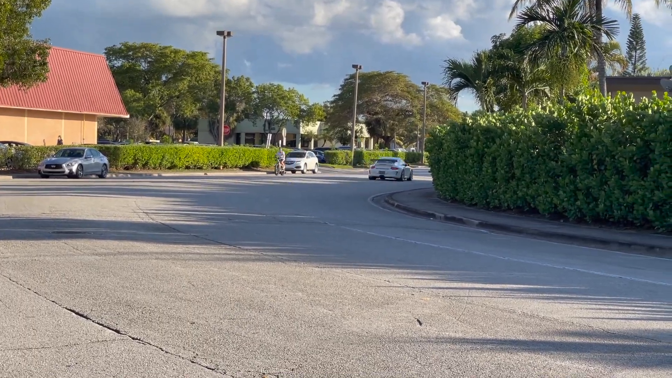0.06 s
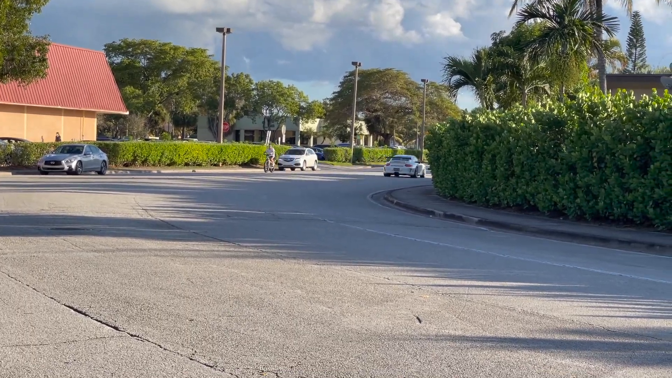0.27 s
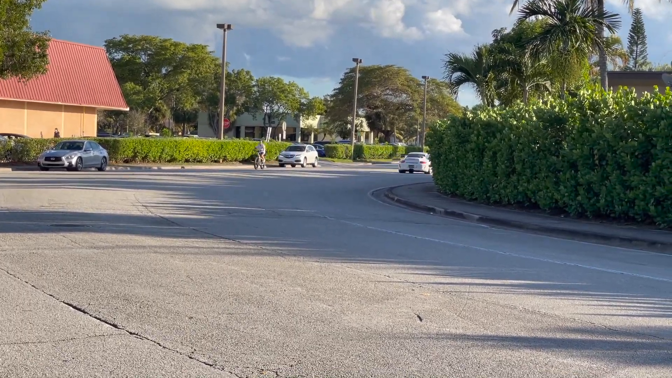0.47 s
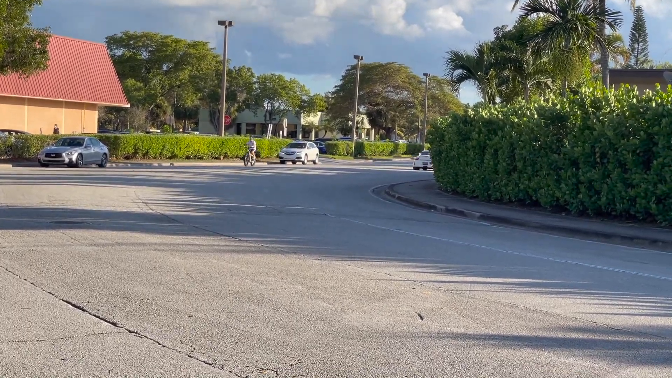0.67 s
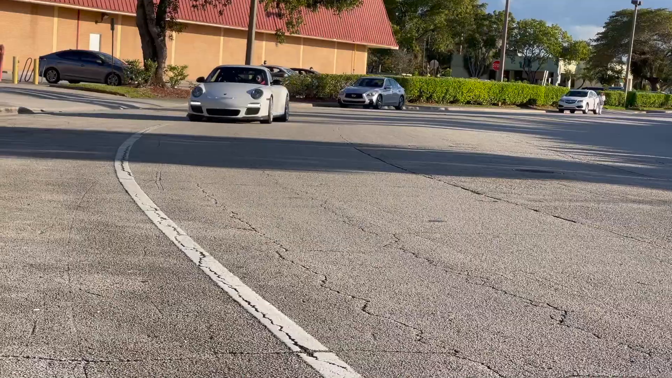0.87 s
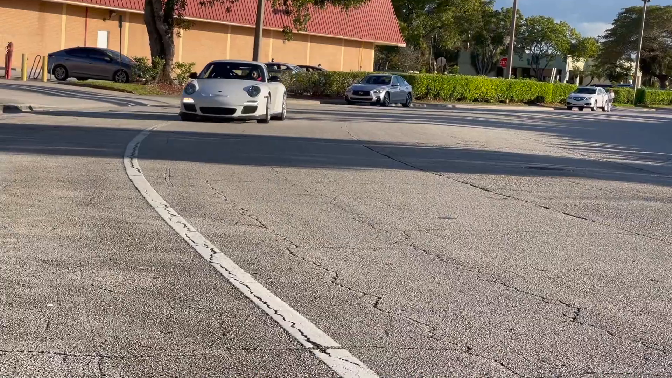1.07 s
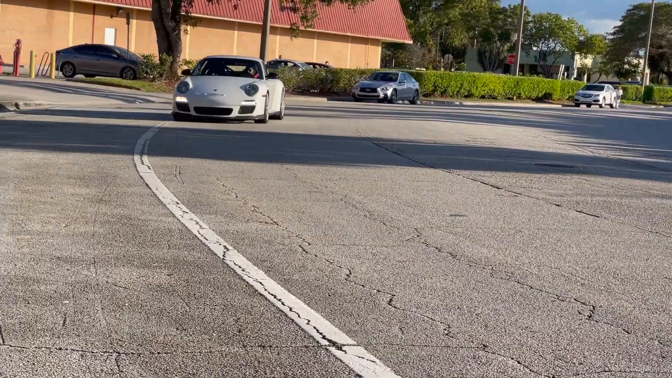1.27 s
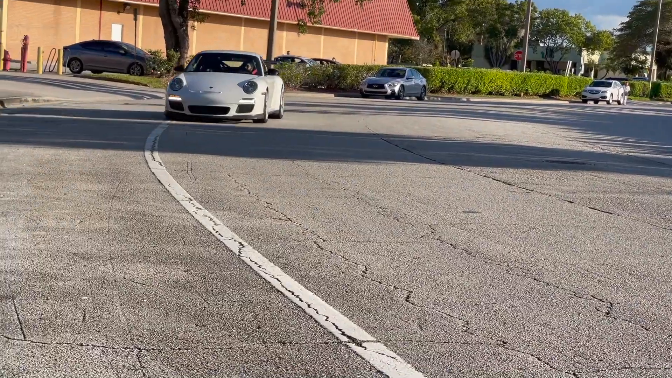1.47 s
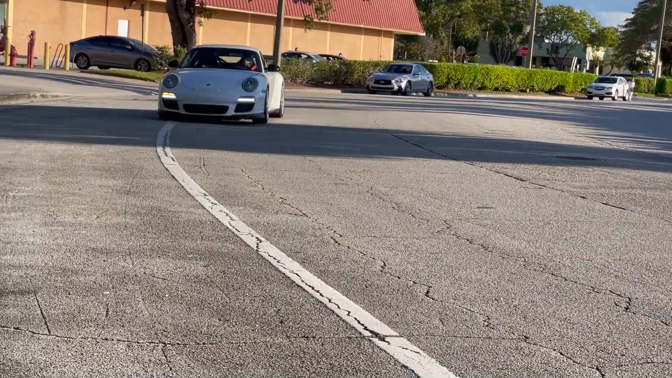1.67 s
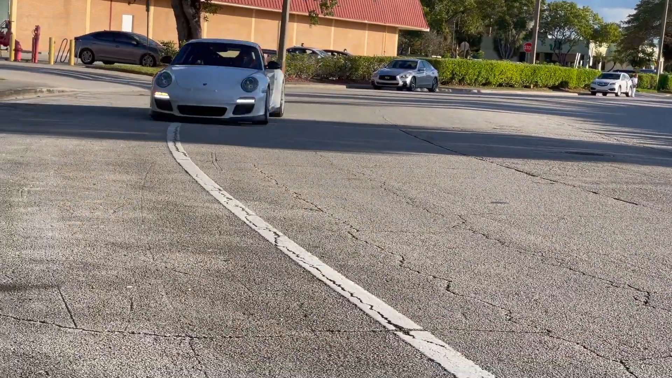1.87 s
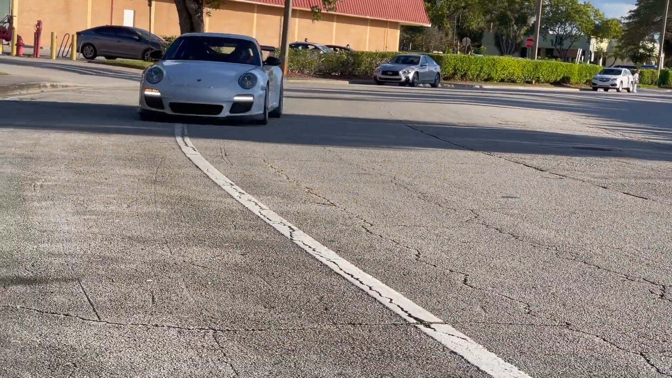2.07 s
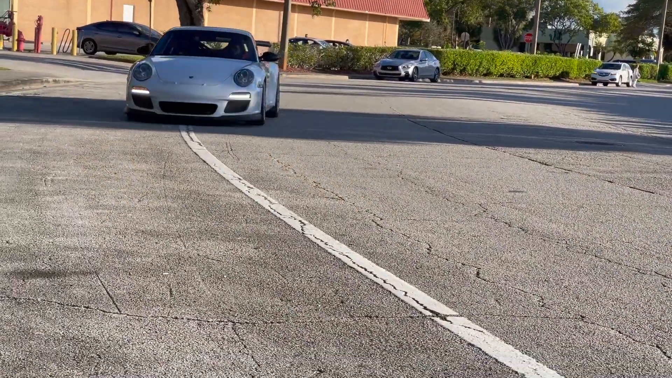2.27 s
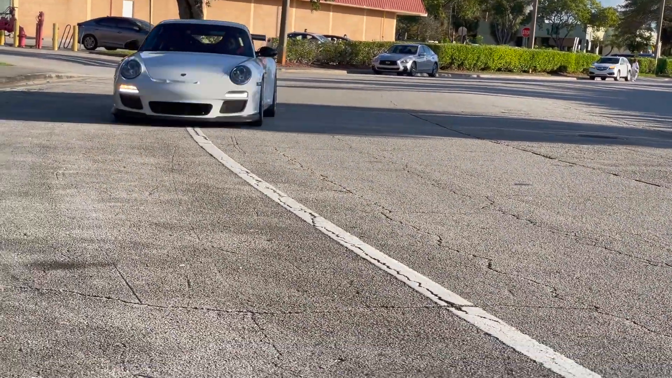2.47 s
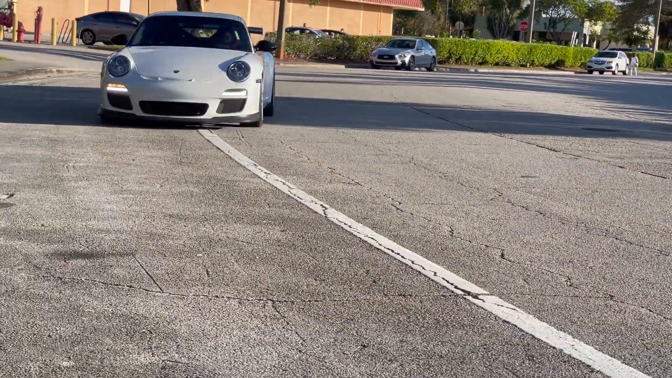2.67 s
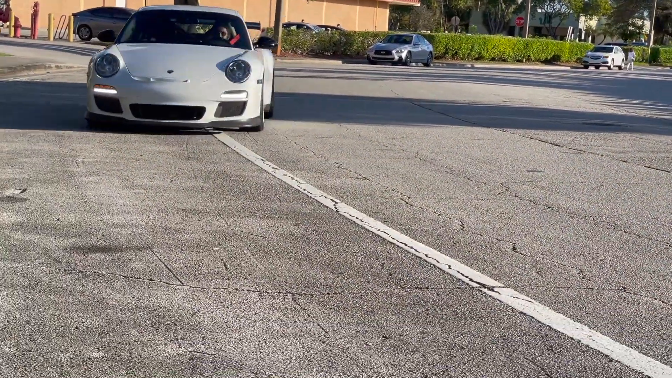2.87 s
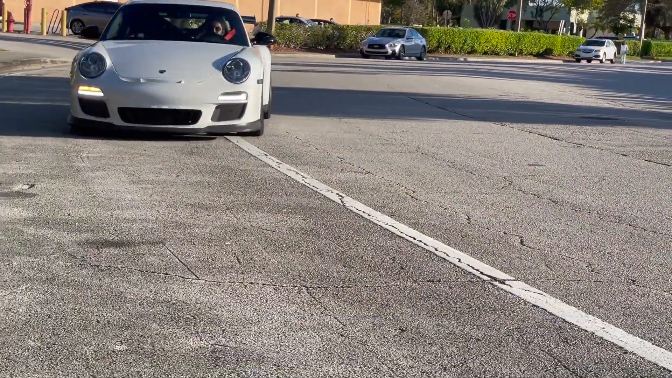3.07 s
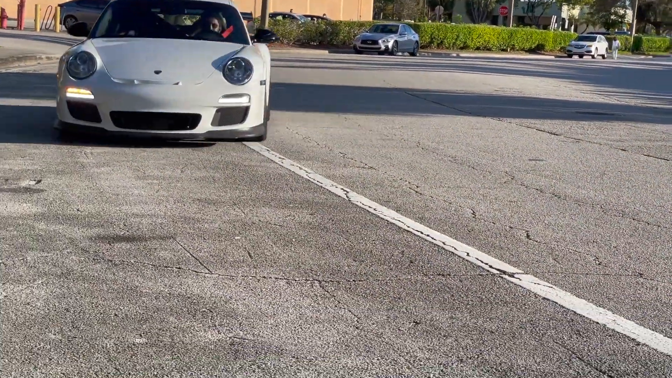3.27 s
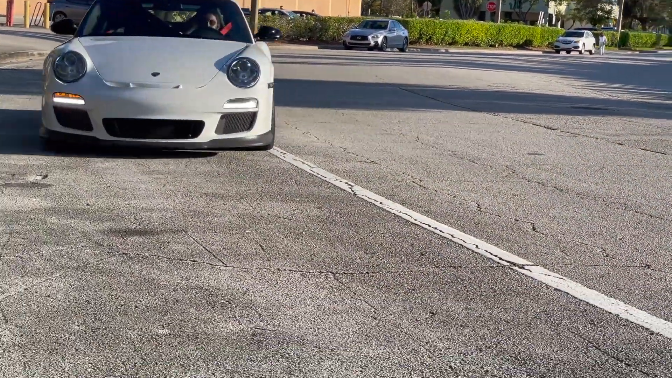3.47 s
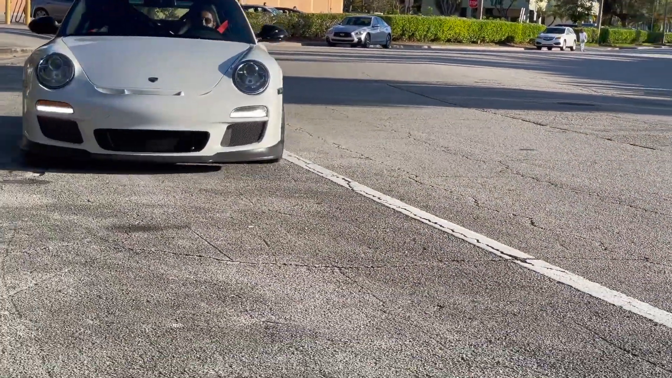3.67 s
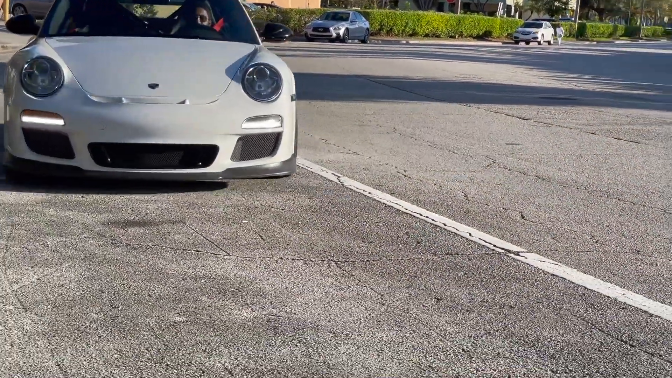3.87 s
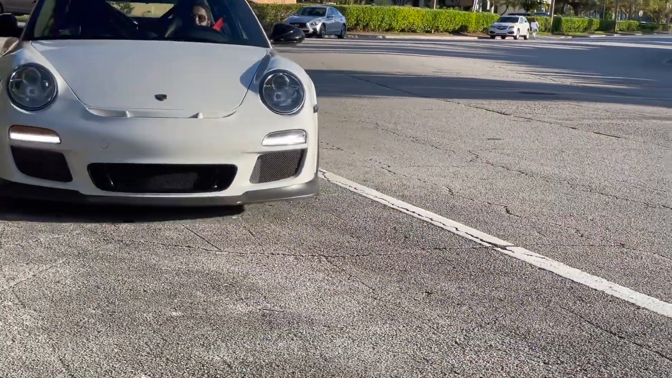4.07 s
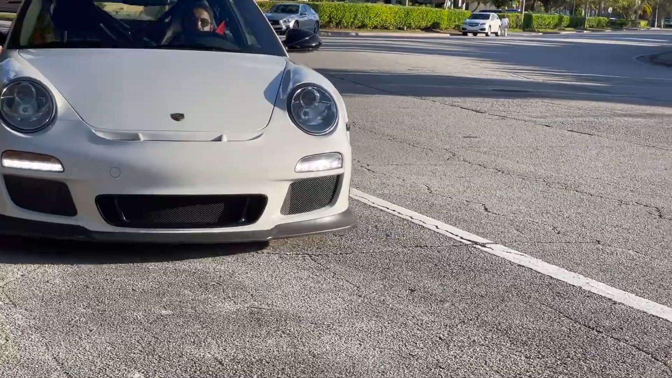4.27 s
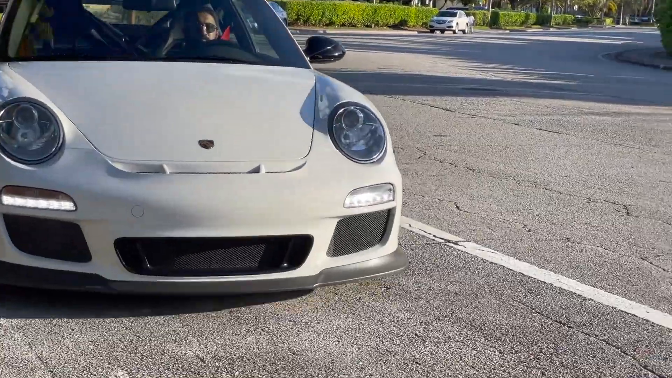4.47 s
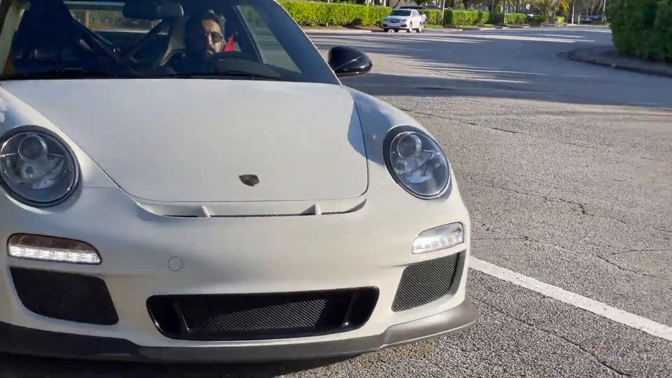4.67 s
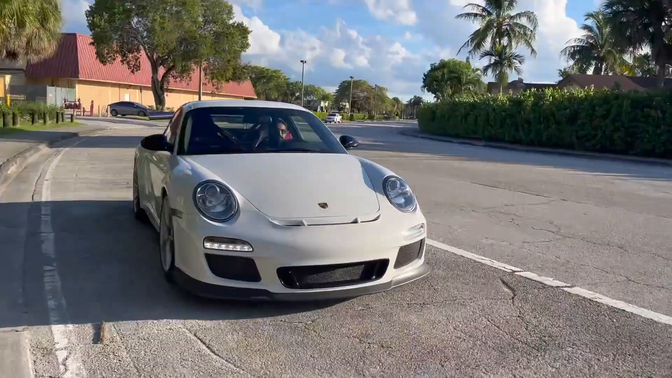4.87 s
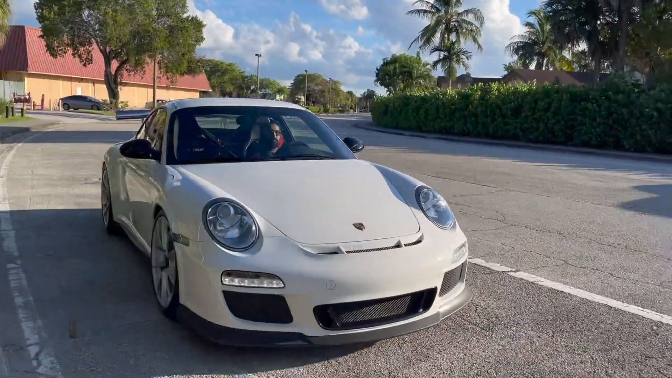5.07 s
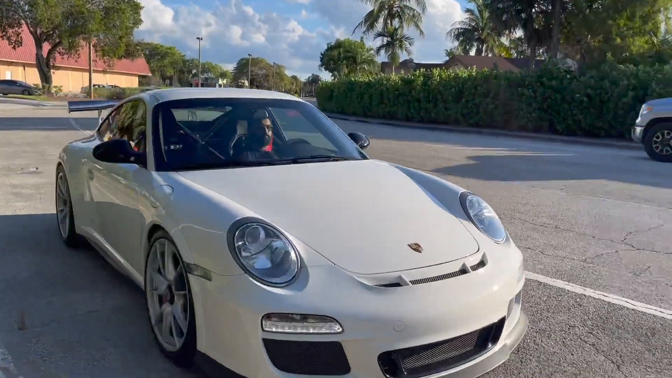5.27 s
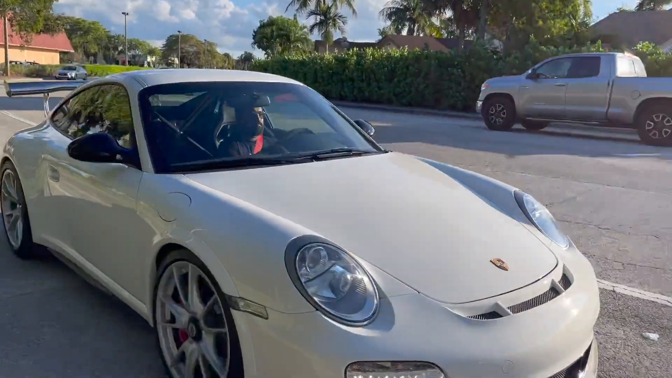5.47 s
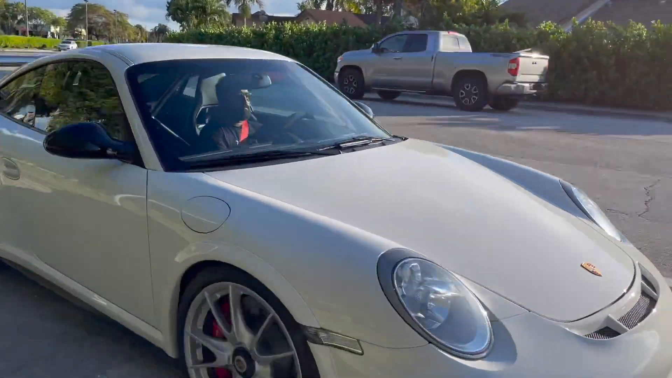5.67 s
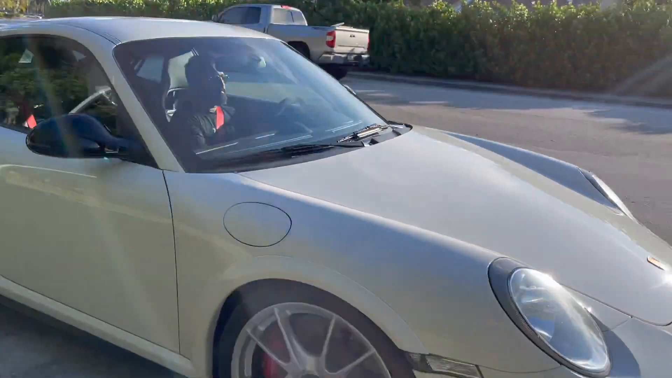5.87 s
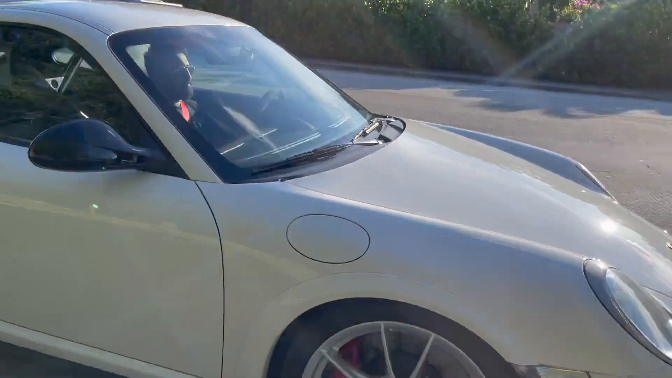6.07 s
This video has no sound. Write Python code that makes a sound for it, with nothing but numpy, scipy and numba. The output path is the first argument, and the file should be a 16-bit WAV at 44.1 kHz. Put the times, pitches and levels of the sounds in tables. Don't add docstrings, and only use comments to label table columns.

```python
import sys
import numpy as np
from scipy import signal
from scipy.fft import rfft, irfft, next_fast_len
from scipy.io import wavfile
from scipy.ndimage import uniform_filter1d
from numba import njit

SR = 44100
rng = np.random.default_rng(int(sys.argv[2]) if len(sys.argv) > 2 else 0)


def boost_factor(decibels):
    exponent = np.asarray(decibels, float) / 20
    return 10 ** exponent


def unload_audio(sound):
    columns = np.transpose(np.atleast_2d(sound))
    steps = np.round(np.clip(columns, -1, 1) * 32767)
    wavfile.write(sys.argv[1], SR, steps.astype(np.int16))


N = 269451
T = np.arange(N) / SR
CUT_S = .772


def level(x):
    return x / np.sqrt(np.mean(x ** 2))


def columns(table):
    s, *values = np.transpose(table)
    return [np.interp(T, s, v) for v in values]


def over_hz(table, hz, column=1):
    table = np.array(table)
    return np.interp(np.log(hz + 1e-9), np.log(table[:, 0]), table[:, column])


def walk(rate):
    return np.interp(T * rate, np.arange(200), rng.standard_normal(200))


@njit
def svf(x, hz, width):
    y, b, l = np.empty(len(x)), 0., 0.
    g, k = np.tan(np.pi * hz / SR), width / hz
    for i in range(len(x)):
        v = (b + g * (x[i] - l)) / (1 + g * (g + k))
        b, l, y[i] = 2 * v - b, l + 2 * g * v, k * v
    return y


def resonate(x, hz, width):
    hz, width = 1. * hz, 1. * width
    return svf(svf(x, hz, width), hz, width)


def rush(spectrum, flicker_db, rate):
    size = next_fast_len(N)
    hz = np.arange(size // 2 + 1) * SR / size
    lowest, highest = spectrum[0][0], spectrum[-1][0]
    inside = (hz > lowest) & (hz < highest)
    noise = rfft(rng.standard_normal((2, size))) * boost_factor(over_hz(spectrum, hz)) * inside
    octave, out = np.log2(hz + 1e-9), 0
    for centre in np.arange(np.log2(lowest), np.log2(highest) + .5, .5):
        share = np.clip(1 - 2 * abs(octave - centre), 0, 1)
        out = out + irfft(noise * share, size)[:, :N] * boost_factor(flicker_db * walk(rate))
    return level(out)


def firings(turns, scatter_db, bank_db):
    at = np.flatnonzero(np.diff(np.floor(turns)))
    pulses = np.zeros(N)
    bank = np.arange(len(at)) % 2
    pulses[at] = boost_factor(scatter_db * rng.standard_normal(len(at)) + bank_db * bank)
    return pulses


# t/s, firing rate f/Hz, level/dB, bite/dB (upper multiples open with load and nearness)
NOTE = [(.85, 94.14, -20.5, -15), (1.16, 89.3, -15, -1), (1.28, 88.4, -13, -28), (1.4, 86.92, -17, 3.5),
        (1.58, 85.5, -23, -0.5), (1.78, 82.1, -18.5, -4.5), (2.04, 77.5, -12, -11), (2.3, 74.62, -18, -25),
        (2.82, 64.8, -15, -14.5), (3.05, 62.43, -20.5, -11), (3.25, 59.24, -22.5, 2.5),
        (3.78, 55.6, -15.5, -1), (4.17, 51.93, -15.5, -2), (4.33, 45.38, -14.5, -0.5),
        (4.58, 40.77, -16.5, 0), (5.36, 40.27, -15, 0), (5.47, 38.83, -14.5, 0), (6.11, 38.38, -13, -0.5)]
# f/Hz, level/dB
SILENCER_PASS = [(39, -22.5), (52, -5), (80, 0.5), (120, -2), (160, -9), (195, -12), (228, -9),
                 (246, -35.5)]
MULTIPLE_LEVELS = [0, 0.5, 2.5, -1, -9.5, 2.5]
# f/Hz, width/Hz, level/dB
PIPE_MODES = [(137.4, 70, 3), (212, 83, 3), (390, 115, -11), (860, 400, -17)]


def exhaust(metres, uneven_db, gust_db):
    hz, level_db, bite_db = columns(NOTE)
    clutch_db = -17.5 * np.interp(T - 2.06, np.cumsum([0, .035, .1, .03]), [0, 1, 1, 0])
    calm_db, waver_full_m = -31.5, 24
    waver_db = np.clip(0.2 * (gust_db - calm_db), .3, 3) * np.clip(metres / waver_full_m, 0, 1)
    hunt_hz, hunts_per_s, hunt_top_s, idle_below_hz = 0.58, 2.95, 5.58, 42.5
    idling = np.clip(idle_below_hz - hz, 0, 1)
    hz = hz + hunt_hz * idling * np.cos(2 * np.pi * hunts_per_s * (T - hunt_top_s))
    turns = np.cumsum(hz * (1 + 0.003906 * walk(25))) / SR

    note = 0
    for k in range(6):
        passed_db = over_hz(SILENCER_PASS, (k + 1) * hz)
        db = level_db + MULTIPLE_LEVELS[k] + clutch_db + passed_db + bite_db * (k > 0) + waver_db * walk(26)
        note = note + np.sqrt(2) * boost_factor(db) * np.sin(2 * np.pi * (k + 1) * turns + 1.23 * k)

    pulses = firings(turns, scatter_db=2.3, bank_db=5.5)
    pipes = 0
    for k, (f, width, db) in enumerate(PIPE_MODES):
        pipes = pipes + (-1) ** k * boost_factor(db) * resonate(pulses, f, width)
    return note + boost_factor(uneven_db) * level(pipes), turns % 1


# f/Hz, level/dB
TYRE_SPECTRUM = [(150, -9.5), (260, -4), (303, -11.5), (349, -5), (403, -9.5), (527, -10), (576, -11),
                 (869, -12.5), (2200, -29), (2860, -62), (4840, -120)]


def tyres(closer_db):
    return boost_factor(-30.5 + 0.54 * closer_db) * rush(TYRE_SPECTRUM, 0.62, 9)


# f/Hz, level/dB
VALVE_SPECTRUM = [(1100, 2), (1550, -0.5), (2000, -5.5), (2550, -3), (3000, -4), (3500, -7.5), (4500, -12),
                  (6000, -26.5)]


def valve_gear(closer_db, phase):
    lift_db = 5 * np.exp(-abs(T - CUT_S) / 0.38)
    puffs = 1 + .25 * np.exp(-phase / 0.14)
    return boost_factor(-45.5 + 0.8 * closer_db + lift_db) * puffs * rush(VALVE_SPECTRUM, 1.0, 9.2)


# t/s, lag/ms, strength (0-1)
ROAD_ECHO = [
    (.78, 1.2, 0),
    (3.9, 1.15, .3),
    (4.35, 1.15, .3),
    (4.5, 1.8, .1),
    (4.8, 1.7, .3),
    (5.2, 1.35, .25),
    (5.7, .8, .3),
    (6.11, .75, .2),
]


def via_ground(sound):
    lag_ms, strength = columns(ROAD_ECHO)
    at = np.arange(N) - lag_ms * SR / 1000
    echo = np.array([np.interp(at, np.arange(N), row) for row in sound])
    echo = uniform_filter1d(echo, size=9)
    return (sound + strength * echo) / np.sqrt(1 + strength ** 2)


def spells_db(events):
    bite_db_per_s, let_go_db_per_s = 900, 340
    start, length, db = np.transpose(events)[:3, :, None]
    before_s = np.clip(start - T, 0, None)
    after_s = np.clip(T - start - length, 0, None)
    shape = db - bite_db_per_s * before_s - let_go_db_per_s * after_s
    return shape.max(axis=0), np.array(events)[shape.argmax(axis=0)].T


# start t/s, length/s, level/dB, starting pitch f/Hz
MAIN_MODE = [
    (2.612, .19, -56, 5820),
    (2.885, .11, -49.5, 5810),
    (4.612, .04, -46, 5760),
    (4.93, 0.11, -56, 5800),
    (5.052, 0.016, -40, 5760),
    (5.54, .02, -46.5, 5710),
    (5.7, .065, -43, 5790),
    (6.078, .05, -35, 5740),
]
# start t/s, length/s, level/dB
HIGH_MODE = [
    (2.545, .08, -53.5),
    (2.8, 0.1, -52.5),
]
# start t/s, length/s, level/dB
MID_MODE = [
    (2.61, 0.077, -67),
    (5.51, 0.02, -48),
]


def brakes():
    main_db, (start_s, _, _, start_hz) = spells_db(MAIN_MODE)
    sag_hz_per_s, wobble_hz = 700, 22
    since_s = np.clip(T - start_s, 0, .2)
    turn = 2 * np.pi * np.cumsum(start_hz - sag_hz_per_s * since_s + wobble_hz * walk(30)) / SR
    chatter = uniform_filter1d(rng.standard_normal(N), size=80)
    grip = 1.35 + level(uniform_filter1d(chatter, size=80))
    main = level(grip * np.sin(turn)) + boost_factor(-19.5) * grip * np.sin(2 * turn)
    high = level(svf(svf(rng.standard_normal(N), 8850.0, 600.), 8630.0, 600.))
    mid = level(resonate(rng.standard_normal(N), 6700., 250.))
    return boost_factor(main_db) * main + boost_factor(spells_db(HIGH_MODE)[0]) * high + boost_factor(spells_db(MID_MODE)[0]) * mid


def clicks(events, decay_s, spread):
    out, t = np.zeros(N), np.arange(4000) / SR
    for s, db, hz in events:
        burst = rng.standard_normal(len(t)) * np.exp(-t / decay_s)
        click = resonate(burst, hz, spread * hz)
        start = int(s * SR)
        out[start:start + len(t)] += boost_factor(db) * click / abs(click).max()
    return out


# t/s, peak level/dB, centre f/Hz
GRIT = [(1.4711, -35, 8650), (1.6773, -37, 8340), (1.6924, -40.5, 7230), (1.9041, -26, 10900),
        (2.0812, -34, 11100), (2.4503, -35, 7540), (2.9043, -31, 8750), (3.1348, -33.5, 7800),
        (3.2295, -36, 6900), (3.2829, -34, 7870), (3.2974, -37, 7700)]
# t/s, peak level/dB, centre f/Hz
STONES = [
    (3.484, -23.5, 750),
    (4.033, -22.5, 1080),
    (4.14, -22, 860),
]
# t/s, peak level/dB, f/Hz
PANEL = [
    (.779, -37, 1180),
]


def impacts():
    return clicks(GRIT, 0.00077, 0.75) + clicks(STONES, 0.0028, 0.6) + clicks(PANEL, 0.02, 0.027)


# f/Hz, level/dB
HISS_SPECTRUM = [(3500, -8), (5000, 0.5), (7000, -0.5), (8500, 0), (10000, 1), (11400, -5), (12000, -15),
                 (12400, -25), (15500, -35)]


def fan(closer_db):
    return boost_factor(-49 + 0.99 * closer_db) * rush(HISS_SPECTRUM, 0.27, 12)


# f/Hz, level/dB
GUST_SPECTRUM = [(30, -30.5), (45, -6), (65, 0.5), (100, -2.5), (160, -6), (260, -12.5), (400, -32.5)]


def wind(gust_db):
    return boost_factor(gust_db) * rush(GUST_SPECTRUM, 1.65, 18)


# t/s, distance/m, uneven firing level/dB
APPROACH = [
    (.78, 24.4, -50.5),
    (1.5, 32.7, -37.5),
    (2.45, 23.6, -35.5),
    (2.8, 23, -46),
    (3.25, 21.3, -33.5),
    (3.67, 16.66, -31.5),
    (4.65, 10.06, -27),
    (5, 8.16, -33.5),
    (5.6, 4.72, -40),
    (6.11, 4.36, -39),
]
# t/s, gust level/dB
GUST_LEVELS = [(.78, -22.5), (1.1, -23), (1.2, -34.5), (1.98, -28), (2.15, -20.5), (2.45, -25),
               (2.7, -23.5), (2.95, -26.5), (3.2, -19.5), (3.45, -23), (3.8, -21.5), (5.4, -26.5),
               (6.11, -23)]


def near_car():
    metres, uneven_db = columns(APPROACH)
    gust_db = columns(GUST_LEVELS)[0]
    closer_db = 20 * np.log10(10 / metres)
    pipes, phase = exhaust(metres, uneven_db, gust_db)
    others = brakes() + impacts()
    running = via_ground(tyres(closer_db) + valve_gear(closer_db, phase))
    noise = running + fan(closer_db) + wind(gust_db)
    wall = np.roll(pipes, int(0.023 * SR))
    return noise + [pipes + others, 0.11 * wall + .5 * others]


# f/Hz, level/dB
GROWL_SPECTRUM = [(30, -33), (50, -12.5), (90, -5.5), (130, -1), (170, -2), (210, -11), (320, -13.5),
                  (400, -28), (520, -30)]
# f/Hz, level/dB
HOWL_SPECTRUM = [(450, -30), (600, -5), (645, 1.5), (700, -6.5), (770, -8.5), (800, -3), (830, -20),
                 (950, -18)]
# f/Hz, level/dB
AIR_SPECTRUM = [(400, -11), (900, -0.5), (1300, 3), (2200, -5.5), (4000, -20), (6000, -25.5)]
# t/s, growl level/dB, howl level/dB, air level/dB
FAR_LEVELS = [
    (0.03, -13.5, -31.5, -37.5),
    (0.116, -22, -38, -37.5),
    (0.244, -16.5, -34, -37),
    (0.282, -21, -39.5, -37),
    (0.61, -20, -47.5, -40.5),
    (0.77, -21, -50, -42),
]


def far_car():
    growl_db, howl_db, air_db = columns(FAR_LEVELS)
    firing_hz = 159.5
    turns = np.cumsum(firing_hz * (1 + 0.011 * walk(23))) / SR
    note = boost_factor(-5.0 + 3.5 * walk(10.0)) * np.sin(2 * np.pi * turns)
    note = note + boost_factor(-24) * np.sin(10 * np.pi * turns)
    growl = boost_factor(growl_db) * (0.72 * rush(GROWL_SPECTRUM, 2.2, 14.9) + note * [[1], [0]])
    howl = boost_factor(howl_db + 3.0) * rush(HOWL_SPECTRUM, 1.7, 12)
    street = boost_factor(air_db) * rush(AIR_SPECTRUM, 0.94, 5.0) + boost_factor(-60) * rush(HISS_SPECTRUM, .7, 10)
    return (growl + howl + street) * [[1], [.2]]


def ports(sound, table):
    size = next_fast_len(N)
    hz = np.arange(size // 2 + 1) * SR / size
    alike = np.clip(over_hz(table, hz), 0, 1)
    direct, scattered = rfft(sound, size) * np.sqrt([(1 + alike) / 2, (1 - alike) / 2])
    slip = np.interp(hz, (8500, 11930), (0, 2 * np.pi))
    lead = over_hz(table, hz, 3) - slip
    tilt = boost_factor(over_hz(table, hz, 2) / 2) * np.exp(.5j * lead)
    return irfft([(direct + scattered) * tilt, (direct - scattered) / tilt], size)[:, :N]


# f/Hz, likeness (0-1), left minus right level/dB, left lead/rad
AHEAD = [(60, 1, 1, 0.21), (248, 0.89, 3, 0.16), (590, 0.51, 1, 0), (1190, 0.67, 1.5, 0.017),
         (2050, 0.78, 0, 0.069), (2310, 1, 0.5, 0.0057)]
# f/Hz, likeness (0-1), left minus right level/dB, left lead/rad
BESIDE = [(59.98, 0.91, 0.91, 0.27), (248.1, 0.88, 4.6, 0.6), (690, 1, 5.3, -0.33), (1520, 0.21, 2.2, 0.39),
          (2520, 0.8, 5.5, 0.44), (5500, 0.32, 2.7, 0.7), (7930, 0.43, 0.5, 1), (8350, 0.96, 1, -0.19)]


def scene():
    fade_s = .012
    sound = np.where(T < CUT_S, far_car(), near_car()) * np.clip(abs(T - CUT_S) / fade_s, .1, 1)
    alongside = np.interp(T, (4.8, 4.93), (0, 1))
    return (1 - alongside) * ports(sound, AHEAD) + alongside * ports(sound, BESIDE)


def roll_off(x):
    return signal.sosfilt(signal.butter(12, 12710, fs=SR, output="sos"), x)


def record(dry):
    mix = np.tanh(0.88 * dry) / 0.82
    return roll_off(mix)


dry = scene()
out = record(dry)
unload_audio(out)
```